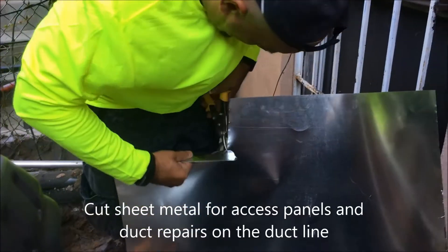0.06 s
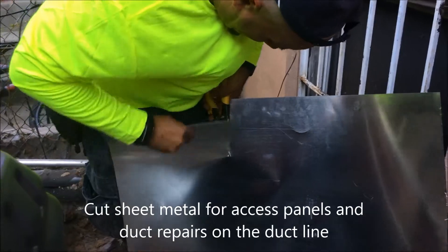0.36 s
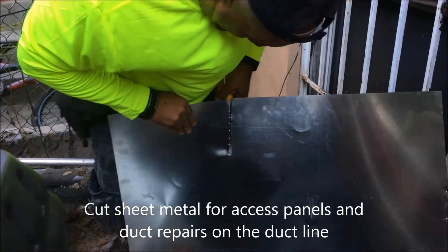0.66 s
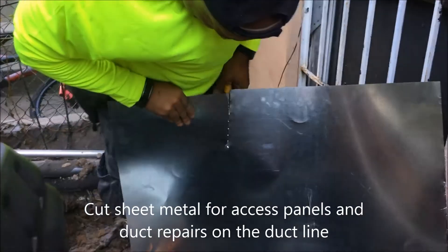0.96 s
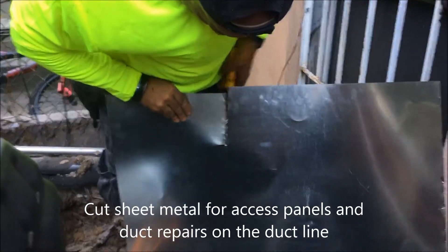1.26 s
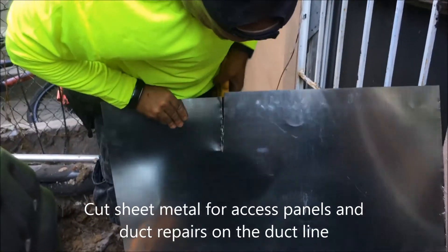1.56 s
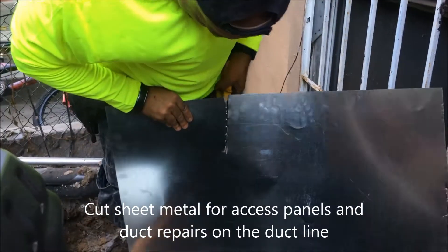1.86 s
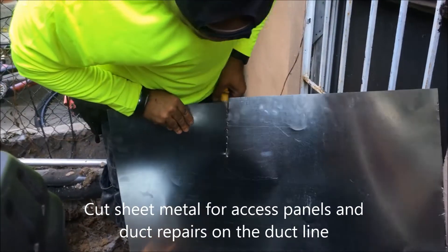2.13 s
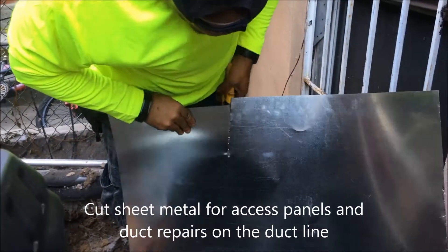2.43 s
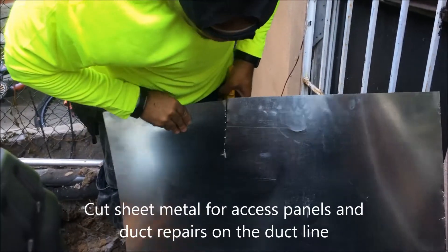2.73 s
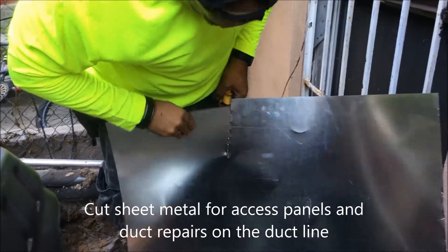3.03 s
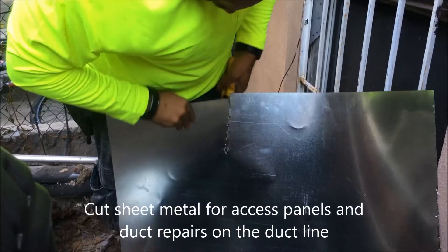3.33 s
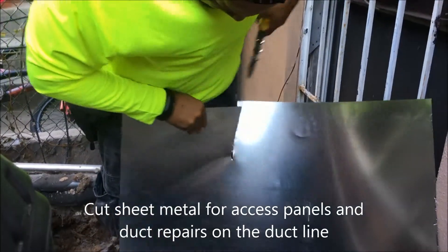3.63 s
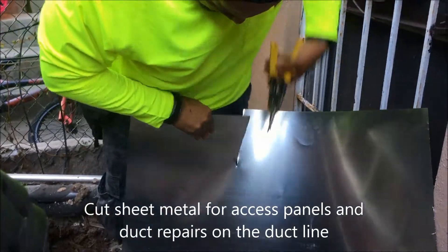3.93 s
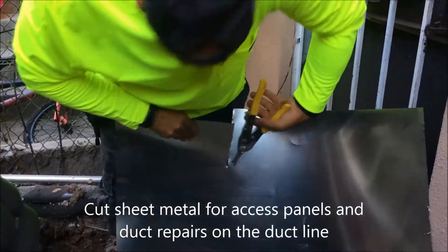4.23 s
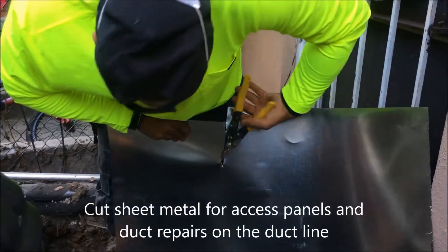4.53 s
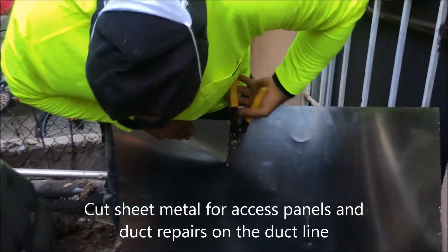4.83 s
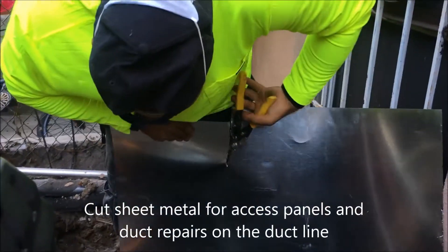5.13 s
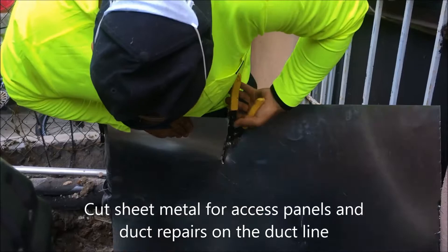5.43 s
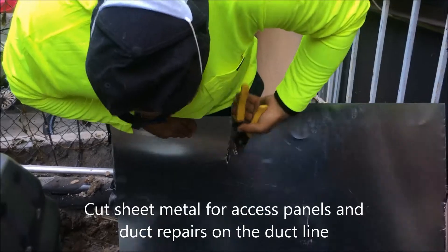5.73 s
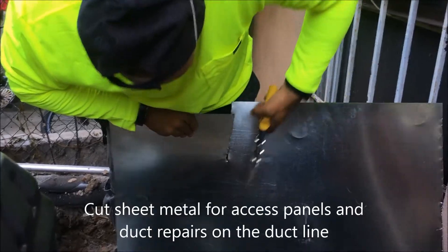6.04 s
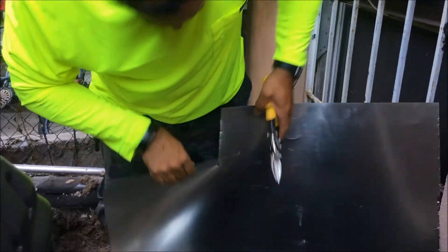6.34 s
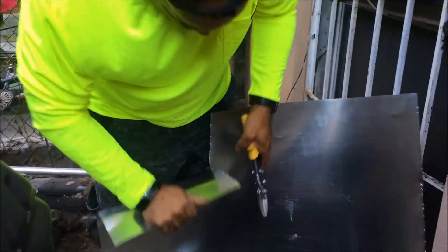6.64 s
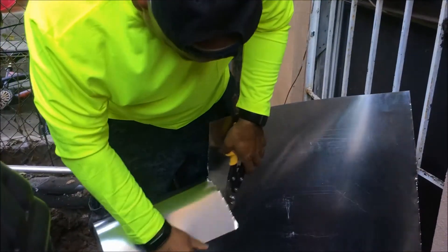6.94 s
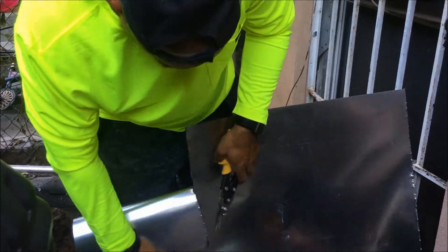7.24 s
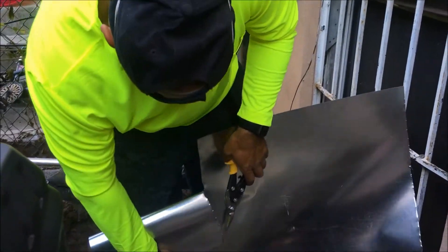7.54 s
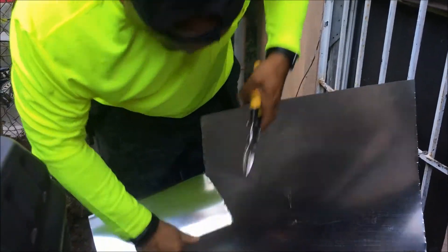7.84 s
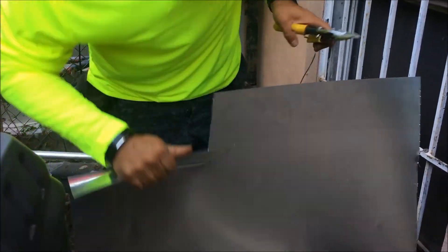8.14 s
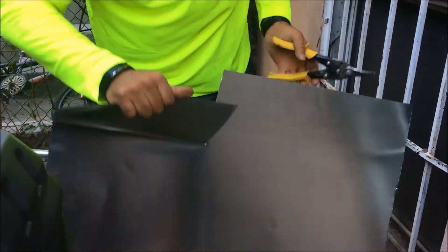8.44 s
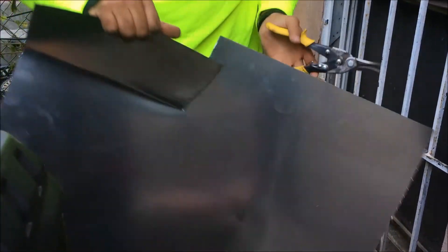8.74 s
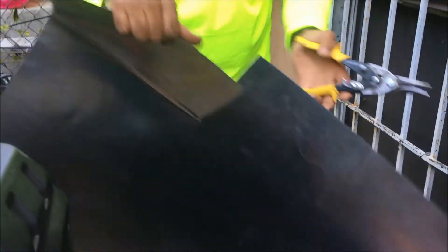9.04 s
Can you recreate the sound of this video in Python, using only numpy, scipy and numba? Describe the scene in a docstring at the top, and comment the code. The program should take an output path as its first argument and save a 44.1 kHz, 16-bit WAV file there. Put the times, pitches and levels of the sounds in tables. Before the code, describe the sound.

Hand snips cut a large thin steel sheet close by, over a faint low rumble. From the start to about 3.6 seconds come irregular sharp snaps and clacks, each leaving a short metallic ring, mixed with light flexing and scraping. Dull knocks stand out near 1.7 and 2.8 seconds, and the strongest snap lands at 3.2. From about 4.2 to 6 seconds the sheet wobbles briefly and more, mostly softer, bites and bumps follow. Around 6.4 seconds it gets louder as the cut flap is bent back: the metal warbles and its raw edges grate, with sharp clicks near 7.2 and a harsh scrape at 7.5. From 8 seconds the whole sheet is lifted, wobbling with short rising and falling whoops, scrapes, a few cracks and low thunder, peaking in a loud flex at about 9.1 seconds.

```python
"""Sharp snaps ring out over a low rumble: hand snips are biting through a large thin steel sheet.
Each stroke is an impulse that excites the sheet's dense modes, so it clacks, knocks and wobbles.
Then the cut flap is bent back, and the changing stiffness makes the modes slide in pitch.
The raw edges grate past each other by stick-slip friction, and the whole sheet is lifted
and thunders in its lowest modes."""
import sys
import numpy as np
from scipy import signal
from scipy.fft import rfft, irfft
from scipy.io import wavfile
from scipy.ndimage import uniform_filter1d, map_coordinates
from numba import njit

SR = 44100
rng = np.random.default_rng(int(sys.argv[2]) if len(sys.argv) > 2 else 0)


def materialize(psi):
    """Save the field psi as 16-bit PCM at rate SR to the path in sys.argv[1].

    A 1-D psi becomes a single channel; in a 2-D psi each row is a channel.
    """
    bounded = np.clip(np.atleast_2d(psi).T, -1, 1)
    quanta = np.round(bounded * 32767).astype(np.int16)
    wavfile.write(sys.argv[1], SR, quanta)


N = 409688
TIME = np.arange(N) / SR


def undb(db):
    """Decibels to amplitude."""
    return 10 ** (np.asarray(db) / 20)


def to_db(power):
    """Power to decibels."""
    return 10 * np.log10(power + 1e-18)


def unit(x):
    """Normalisation to rms 1."""
    return x / np.sqrt(np.mean(x ** 2) + 1e-18)


def attack_level(x, db):
    """Normalisation of a blow by the rms of its first 15 ms."""
    return x * undb(db) / np.sqrt(np.mean(x[:int(.015 * SR)] ** 2))


def steady(x):
    """Division by the running 50 ms rms evens out a texture and keeps its grain."""
    return x / np.sqrt(np.abs(uniform_filter1d(x ** 2, int(.05 * SR))) + 1e-12)


def fade(t, t60):
    """Exponential damping, 60 dB down after t60."""
    return np.exp(-np.log(1000) * t / t60)


def add(track, start, sound):
    """Superposition of a sound on a track, from a start time in seconds."""
    i = max(int(start * SR), 0)
    track[i:i + len(sound)] += sound[:N - i]


def colour(x, points):
    """Minimum-phase filter with a spectrum of (frequency [Hz], level [dB]) points."""
    hz, db = np.transpose(points)
    size = 4096
    grid = np.maximum(np.arange(size // 2 + 1) * SR / size, 1)
    cepstrum = irfft(np.log(undb(np.interp(np.log(grid), np.log(hz), db))))
    cepstrum[1:size // 2] *= 2
    cepstrum[size // 2 + 1:] = 0
    return signal.fftconvolve(x, irfft(np.exp(rfft(cepstrum))))[:len(x)]


@njit
def resonance(x, hz, q):
    """Two-pole resonator: a band-pass whose centre moves every sample."""
    y, band, low = np.empty(len(x)), 0., 0.
    damping = 1 / q
    for i in range(len(x)):
        g = np.tan(np.pi * hz[i] / SR)
        v = (band + g * (x[i] - low)) / (1 + g * (g + damping))
        band, low, y[i] = 2 * v - band, low + 2 * g * v, damping * v
    return y


def walk(rate):
    """Smooth random modulation of rms 1, with `rate` new values a second."""
    span = max(int(SR / rate), 2)
    steps = np.repeat(rng.standard_normal(N // span + 1), span)
    return unit(uniform_filter1d(uniform_filter1d(steps, span), span)[:N])


def slips(rate, spread_db):
    """Stick-slip as a Poisson process: `rate` tiny jerks a second, of uneven size."""
    size = undb(spread_db * np.minimum(rng.exponential(size=N), 5))
    return (rng.random(N) < rate / SR) * size * rng.choice([-1, 1], N)


# spectrum of the background: (frequency [Hz], level [dB])
RUMBLE_SPECTRUM = [(25, -31), (55, -1), (85, -10), (300, -21.5), (600, -20), (1200, -22), (3000, -36),
                   (8000, -44), (15500, -48.5)]


def rumble(level_db=-47):
    """Filtered noise, strongest in the bass, whose level wanders by about a decibel."""
    return unit(colour(rng.standard_normal(N), RUMBLE_SPECTRUM)) * undb(level_db + walk(2.8))


# the sheet's overlapping modes: (frequency [Hz], spectral level [dB], t60 [s])
DENSE_MODES = [(101, -26.5, 0.47), (312, -2.5, 0.3), (530, 0, 0.35), (1000, -4, 0.85), (1735, -4, 0.47),
               (2850, -18, 0.6), (5070, -21.5, 0.4), (9400, -30, 0.31), (15000, -38, 0.059)]
# modes that stand out from the rest: (frequency [Hz], level [dB])
CLEAR_MODES = [(905, 8), (1402, 12.5), (2102, 5), (2672, -1.5), (2762, -1), (3149, 4), (3768, -1.5),
               (4398, 1), (5340, -5), (5593, -10.5), (5889, -5)]


def sheet_response(clear_db=-7, t60_at_1khz=0.19):
    """Impulse response of a thin plate, with energy 1: a noise-like crowd of modes, a few clear ones."""
    t = TIME[:SR]
    hz, db, t60 = np.transpose(DENSE_MODES)
    grid = np.log(np.maximum(np.arange(SR // 2 + 1), 1))
    crowd = rfft(rng.standard_normal(SR)) * undb(np.interp(grid, np.log(hz), db))
    dense = sum(irfft(crowd * np.interp(grid, np.log(hz), band), SR) * fade(t, life)
                for band, life in zip(np.eye(len(hz)), t60))
    clear = sum(undb(level) * np.sin(2 * np.pi * (f * t + rng.random()))
                * fade(t, t60_at_1khz * (1000 / f) ** 0.85) for f, level in CLEAR_MODES)
    return unit(unit(dense) + undb(clear_db) * unit(clear)) / np.sqrt(SR)


def rung(drive, response):
    """Forced vibration: the drive convolved with an impulse response, at rms 1."""
    return unit(signal.fftconvolve(drive, response)[:N])


def with_ring(direct, sheet, ring_db):
    """Plate reverberation: a sound plus the ring it leaves in the sheet, ring_db relative to it."""
    return direct + undb(ring_db) * np.std(direct) * rung(direct, sheet)


def push(start, rise, hold, t60, swell=1.435):
    """Envelope of one push: forced motion swells and holds, then decays freely."""
    t = TIME[:int((rise + hold + t60) * SR)]
    out = np.zeros(N)
    add(out, start, np.minimum(t / rise, 1) ** swell * fade(np.maximum(t - rise - hold, 0), t60))
    return out


def shivers(t60, rise_s=0.021, hold_s=0.022):
    """Envelope of free vibration: each snap releases the sheet, in proportion to its after-ring."""
    return np.sqrt(sum((undb(ring) * push(start, rise_s, hold_s, t60)) ** 2 for start, *_, ring in SNAPS))


def stirring(t60, unsteady_db=4.0):
    """Envelope of random forcing: sheet and blades never quite rest while the snips work."""
    return push(start=0.62, rise=0.556, hold=5.0, t60=t60) * undb(unsteady_db * walk(9))


# the hand bending the sheet: (time [s], rise [s], hold [s], level [dB], centre [Hz], sway level [dB])
BENDS = [(0.801, 0.027, 0.064, -42.5, 1388, -40.5), (1.2, 0.025, 0.09, -32, 894, -37.5),
         (1.35, 0.037, 0.033, -25.5, 1268, -51), (1.58, 0.056, 0.028, -29.5, 894, -30.5),
         (2.02, 0.03, 0.011, -30, 680, -55), (2.104, 0.092, 0.033, -26, 1150, -32),
         (2.954, 0.015, 0.02, -31, 724, -54), (3.411, 0.073, 0.031, -26, 1113, -39),
         (3.567, 0.0089, 0.056, -24.5, 1099, -40), (3.769, 0.031, 0.092, -31.5, 752, -34.5),
         (4.17, 0.0043, 0.033, -38, 469, -32), (4.241, 0.042, 0.042, -24.5, 643, -28.5),
         (4.443, 0.047, 0.17, -37, 764, -32), (5.466, 0.08, 0.097, -33, 722, -42),
         (5.634, 0.041, 0.036, -28, 1152, -37), (5.775, 0.03, 0.036, -30, 1105, -31),
         (6.132, 0.14, 0.056, -36, 1186, -73), (6.313, 0.028, 0.045, -27.5, 1500, -57),
         (6.465, 0.052, 0.069, -22.5, 1355, -31), (6.599, 0.02, 0.046, -16.5, 1363, -31),
         (6.689, 0.038, 0.064, -15, 1494, -25.5), (7.183, 0.0055, 0.013, -13, 1173, -21),
         (7.331, 0.028, 0.032, -31, 1097, -41), (7.459, 0.037, 0.14, -15.5, 1652, -26.5),
         (7.685, 0.019, 0.043, -23.5, 1228, -30.5), (7.997, 0.055, 0.02, -13.5, 1407, -21),
         (8.057, 0.022, 0.047, -13.5, 1041, -30), (8.211, 0.034, 0.05, -16.5, 943, -23.5),
         (8.344, 0.03, 0.39, -20, 997, -23), (8.802, 0.07, 0.21, -24, 848, -26),
         (9.062, 0.031, 0.051, -11.5, 646, -23), (9.157, 0.031, 0.059, -16, 865, -33)]


def bending(t60=0.619, shiver_hz=921.6, stir_hz=756.4, held_db=-58.5, tightening=0.1432):
    """Level [dB] and centre [Hz] of the flexing: pushes add in power, and pitch rises with amplitude."""
    shiver = (undb(-2.5) * shivers(t60)) ** 2
    stir = (undb(-44.5) * stirring(t60)) ** 2 + undb(held_db) ** 2
    power = shiver + stir
    weighted_hz = shiver * shiver_hz + stir * stir_hz
    for start, rise, hold, db, hz, _ in BENDS:
        effort = push(start, rise, hold, t60)
        share = (undb(db) * effort) ** 2
        power += share
        weighted_hz += share * hz * effort ** tightening
    return to_db(power), weighted_hz / power


def sway_level(t60=1, held_db=-46.5):
    """Level [dB] of the panel's sway: bends, snaps, cutting and mere holding add in power."""
    power = sum((undb(db) * push(start, rise, hold, t60)) ** 2 for start, rise, hold, _, _, db in BENDS)
    shiver = undb(-3.5) * shivers(t60)
    stir = undb(-46) * stirring(t60)
    return to_db(power + shiver ** 2 + stir ** 2 + undb(held_db) ** 2)


# spectrum of the whole panel swaying: (frequency [Hz], level [dB])
PANEL_SPECTRUM = [(30, -13), (55, -15), (125, 1), (180, 4.5), (230, -6), (290, 5), (380, -4.5), (520, -9),
                  (900, -73.5)]


def swaying(sheet, gain_db=-1.5, split_hz=200, stiffening=0.33, rest_db=-36):
    """Nonlinear coupling: the panel's low modes thunder; a harder push moves energy to higher ones."""
    db = sway_level()
    thunder = colour(slips(rate=250, spread_db=-1.5), PANEL_SPECTRUM)
    deep = signal.sosfiltfilt(signal.butter(3, split_hz, fs=SR, output="sos"), thunder)
    tilt = undb(stiffening * (db - rest_db))
    tilted = deep / tilt + (thunder - deep) * tilt
    return with_ring(steady(tilted) * undb(db + gain_db), sheet, ring_db=-9)


# spectrum of the flexing sheet: (frequency [Hz], level [dB])
FLEX_SPECTRUM = [(150, -17.5), (300, 2), (480, -1.5), (950, -1), (1550, -1.5), (2100, -2.5), (2800, -0.5),
                 (5000, -47)]


def flexing(sheet, gain_db=-0.5, q=0.8, wobble_s=.006, slide=0.3005):
    """Curvature stiffens a plate: little buckles keep it ringing while all its modes slide together."""
    db, hz = bending()
    hz = np.clip(hz, 200, 4000)
    buckles = slips(rate=1000, spread_db=2.9)
    ringing = rung(buckles, sheet_response(clear_db=-13))
    ringing += unit(colour(buckles, np.array(DENSE_MODES)[:, :2]))
    bend = np.log(hz) - uniform_filter1d(np.log(hz), SR // 2)
    clock = np.arange(N) + slide * np.cumsum(bend) + wobble_s * SR * walk(5)  # faster means higher
    sliding = map_coordinates(ringing, [clock], order=3, mode="mirror")
    flex = colour(resonance(sliding, hz, q), FLEX_SPECTRUM)
    return with_ring(steady(flex) * undb(db + gain_db), sheet, ring_db=-11)


# narrow cries of sheet and blades: (time [s], length [s], start pitch [Hz], end pitch [Hz], level [dB])
WHOOP_GLIDES = [(0.64, 0.18, 924, 940, -51.5), (0.901, .045, 1610, 1635, -36),
                (1.057, 0.04, 11900, 12000, -48), (1.067, 0.13, 1017, 1210, -38.5),
                (4.244, 0.15, 702, 1253, -30.5), (4.561, 0.026, 2340, 2800, -37),
                (4.865, 0.058, 2990, 3200, -45), (5.638, 0.091, 1385, 1403, -29),
                (6.621, 0.19, 1303, 1700, -31), (8.07, 0.12, 1400, 1018, -19.5),
                (8.222, 0.09, 914, 1493, -19), (8.242, .13, 1685, 2135, -25), (8.367, .06, 1004, 935, -21),
                (8.69, .07, 901, 696, -22.5), (9.071, 0.04, 565, 680, -15), (9.112, 0.058, 744, 926, -11.5),
                (9.139, 0.16, 1054, 1153, -19)]


def whoops(sheet, relative_width=0.21):
    """Beating: a cluster of neighbouring modes swells and glides as the curvature changes."""
    out = np.zeros(N)
    for start, length, start_hz, end_hz, db in WHOOP_GLIDES:
        progress = np.linspace(0, 1, int(length * SR) + 2)
        phase = 2 * np.pi * np.cumsum(start_hz + (end_hz - start_hz) * progress) / SR
        lowpass = signal.butter(2, relative_width * start_hz / 2, fs=SR, output="sos")
        beats = signal.sosfilt(lowpass, rng.standard_normal((2, len(progress) + SR)))[:, SR:]
        cluster = beats[0] * np.sin(phase) + beats[1] * np.cos(phase)
        swell = np.sqrt(np.abs(np.sin(np.pi * progress)))
        add(out, start, unit(cluster * swell) * undb(db))
    return with_ring(out, sheet, ring_db=-10)


def brief_ring(drive, ring_db=-2, t60=0.037):
    """A short random ring gives crunches and scrapes narrow, uneven resonant peaks."""
    t = TIME[:SR // 10]
    ring = unit(rng.standard_normal(len(t)) * fade(t, t60)) / np.sqrt(len(t))
    return drive + undb(ring_db) * signal.fftconvolve(drive, ring)[:len(drive)]


# cut edges and blades grating: (time [s], rise [s], hold [s], level [dB], relative fizz level [dB])
SCRAPE_STROKES = [(0.808, .008, .005, -51, -20), (1.052, 0.014, 0.015, -42.5, -3),
                  (1.272, 0.0093, 0.035, -45, -7), (1.337, 0.024, 0.019, -32, -11),
                  (1.579, 0.017, 0.043, -42.5, -6), (1.63, 0.017, 0.017, -39, -12),
                  (1.888, 0.03, 0.12, -48, -9.5), (2.088, 0.088, .01, -38.5, -9),
                  (2.583, 0.011, 0.073, -55, -9), (3.07, .04, 0.12, -50, -12),
                  (3.384, 0.016, 0.055, -43, -15), (3.45, 0.03, 0.0066, -33.5, -7.5),
                  (3.941, 0.025, .01, -44, -12), (4.265, 0.018, 0.017, -37, -8),
                  (4.438, 0.046, .006, -40.5, -14), (4.67, 0.014, .006, -43.5, -11),
                  (4.873, 0.017, .01, -40, -19), (5.218, 0.0039, 0.0043, -53.5, 1.5),
                  (5.41, 0.086, 0.19, -49.5, -11), (5.622, 0.025, 0.029, -38.5, -12),
                  (5.785, 0.027, .01, -39.5, -9), (5.918, 0.012, 0.025, -52, -3),
                  (6.144, 0.065, 0.17, -48, -13), (6.295, 0.039, 0.12, -35.5, -16),
                  (6.455, 0.038, 0.091, -25.5, -8.5), (6.593, 0.034, 0.12, -19.5, -12),
                  (6.721, 0.057, 0.046, -23, -13), (6.823, 0.032, 0.02, -19, -9.5),
                  (7.198, 0.047, 0.022, -25.5, -16), (7.325, 0.023, 0.05, -27.5, -18),
                  (7.459, 0.013, 0.13, -12, -12.5), (7.876, 0.047, 0.066, -39.5, -12),
                  (7.991, 0.013, .04, -21, -14), (8.029, 0.052, 0.038, -18.5, -9.5),
                  (8.18, 0.031, 0.15, -29.5, -17.5), (8.35, 0.048, 0.23, -25, -13),
                  (8.6, 0.047, 0.17, -24, -34), (8.813, 0.026, 0.15, -35, -47),
                  (9.069, 0.0078, 0.019, -26, -3), (9.112, 0.025, 0.13, -29, -20)]


def friction(edge_t60=0.42, burr_t60=0.3):
    """Incoherent rubs add in power: the level [dB] of the edges, and of the burr's fizz relative to it."""
    shiver = undb(-26.5) * shivers(edge_t60)
    stir = undb(-68.5) * stirring(edge_t60)
    edge = shiver ** 2 + stir ** 2
    burr = (undb(-7) * shiver) ** 2 + (undb(-4) * stir) ** 2
    for start, rise, hold, db, fizz_db in SCRAPE_STROKES:
        edge += (undb(db) * push(start, rise, hold, edge_t60)) ** 2
        burr += (undb(db + fizz_db) * push(start, rise, hold, burr_t60)) ** 2
    return to_db(edge), to_db(burr) - to_db(edge)


# spectra of the grating edge and of its burr: (frequency [Hz], level [dB])
EDGE_SPECTRUM = [(900, -14), (1600, -0.5), (2200, 5.5), (3100, 3), (4500, -3), (5900, -7.5), (7500, -17),
                 (10000, -49)]
BURR_SPECTRUM = [(3500, -72), (5500, 9), (7000, 0), (9600, -2.5), (10500, -9.5), (11500, -3),
                 (15500, -10.5)]


def scraping(sheet, edge_db=-1, judder_db=0.83, dull_hz=3800, contact_db=-17):
    """Stick-slip friction: raw edges catch and let go, ringing the high modes; the burr fizzes on top."""
    db, fizz_db = friction()
    db = db + judder_db * walk(110)
    catches = brief_ring(slips(rate=2000, spread_db=3.4))
    edge = colour(catches, EDGE_SPECTRUM)
    # struck along its rim, steel radiates its high, clear modes best
    rim = np.diff(sheet_response(clear_db=-8.5, t60_at_1khz=.5))
    edge = unit(edge) + undb(-2) * rung(edge, rim)
    # when the burr loses contact only the duller part keeps sounding
    dull = signal.sosfiltfilt(signal.butter(2, dull_hz, fs=SR, output="sos"), edge)
    edge = dull + (edge - dull) * undb(np.minimum(fizz_db - contact_db, 0))
    grating = with_ring(steady(edge) * undb(db + edge_db), sheet, ring_db=-11)
    burr = colour(catches, BURR_SPECTRUM)
    fizz = steady(unit(burr) + undb(5) * rung(burr, np.diff(rim)))
    return grating + fizz * undb(db + fizz_db)


# the sheet bumping against hands and support: (time [s], level [dB], pitch [Hz])
SOFT_BLOWS = [(0.149, -20, 300), (0.208, -23.5, 350), (1.607, -21.5, 285), (1.631, -21.5, 287),
              (1.666, -13, 275), (1.935, -24, 308), (2.674, -15, 298), (2.691, -19, 302), (2.74, -20, 288),
              (2.766, -9.5, 304), (3.171, -30, 295), (3.561, -24, 262), (4.867, -24, 288),
              (5.057, -23.5, 199), (5.111, -23, 198), (5.138, -22, 304), (5.354, -22.5, 295),
              (5.91, -25, 200), (6.406, -20, 293), (7.189, -17, 330), (7.933, -25.5, 197),
              (8.635, -22, 295)]


def knocks(sheet, gain_db=-4, low_ratio=.55, scatter=0.12):
    """Soft impacts excite mainly low, heavily damped modes, whose pitch depends on the hold."""
    out, t = np.zeros(N), TIME[:SR // 5]
    for start, db, hz in SOFT_BLOWS:
        low_hz = hz * low_ratio * np.exp(scatter * rng.standard_normal())
        upper = np.sin(2 * np.pi * hz * t) * fade(t, 0.047)
        lower = undb(-3) * np.sin(2 * np.pi * low_hz * t) * fade(t, 0.046)
        thud = (upper + lower) * (1 - fade(t, 0.015))
        add(out, start, attack_level(thud, db + gain_db))
    return with_ring(out, sheet, ring_db=-9)


# spectrum of steel cracking or clicking: (frequency [Hz], level [dB])
CRACK_SPECTRUM = [(900, -13), (2200, 15), (4000, 7.5), (6300, 5), (10500, -9.5), (15500, -15)]


def crack(burst):
    """A brief, hard contact radiates mostly treble: a noise burst is given that spectrum."""
    return colour(burst, CRACK_SPECTRUM)


def ticks(rate=7, level_db=-69, t60=.07):
    """Light impacts: the blades touch at random moments and tick faintly."""
    tick = crack(rng.standard_normal(SR) * fade(TIME[:SR], t60))
    return undb(level_db) * rung(slips(rate, spread_db=1), tick)


# modes of the steel close to the jaws: (frequency [Hz], level [dB], t60 [s])
CLACK_MODES = [(522, -3, 0.047), (745, -2.5, 0.039), (909, 1, 0.069), (1305, -5, 0.038),
               (1613, -3.5, 0.043)]
# the jaws biting through: (time [s], body level [dB], crack level [dB], after-ring level [dB])
SNAPS = [(0.1076, -35, -38, -43), (0.153, -45, -31.5, -29), (0.2085, -24, -28, -33),
         (0.903, -35, -40.5, -37), (0.946, -19.5, -35, -29.5), (0.9502, -17.5, -28, -55),
         (1.082, -28, -34.5, -38.5), (1.353, -33, -39, -30), (1.7475, -27, -36, -32),
         (2.2161, -20.5, -30.5, -33.5), (2.4046, -24.5, -32, -30.5), (2.675, -32, -64, -39.5),
         (2.756, -31.5, -42, -33), (2.971, -29.5, -51, -41), (3.224, -13, -25.5, -28),
         (3.567, -22.5, -57, -29.5), (4.5688, -35, -41, -39), (4.87, -33.5, -49, -39),
         (4.96, -61, -41.5, -49.5), (5.0575, -31.5, -37.5, -31.5), (5.136, -19, -37.5, -37.5),
         (5.351, -29, -38, -35.5), (5.652, -35, -44, -33.5), (5.9117, -39, -38.5, -37.5),
         (6.027, -52, -42, -78), (7.188, -23, -58, -52), (7.237, -50.5, -20.5, -42),
         (7.351, -43, -26.5, -38), (8.003, -34, -34, -23.5), (8.596, -28, -20, -45), (9.082, -27, -30, -45)]


def snaps(sheet, scatter=0.025, retune=.03, buckle_t60=0.088, crunch_t60=0.13, spreading_s=0.037):
    """Fracture frees stored elastic energy: a crunch, a clack and a buckle, then the whole sheet rings."""
    out, t = np.zeros(N), TIME[:SR // 5]
    hz, db, t60 = np.transpose(CLACK_MODES)[:, :, None]
    early_ring = slice(int(.02 * SR), int(.06 * SR))
    buckle_band = signal.butter(2, [470, 1600], "band", fs=SR, output="sos")
    for start, body_db, crack_db, ring_db in SNAPS:
        # the jaws stand somewhere else and the sheet is bent differently at every bite
        tuning = np.exp(scatter * rng.standard_normal(hz.shape))
        bent = np.interp(TIME[:SR] * np.exp(retune * rng.standard_normal()), TIME[:SR], sheet)
        phase = 2 * np.pi * (hz * tuning * t + rng.random(hz.shape))
        clack = (undb(db) * np.sin(phase) * fade(t, t60)).sum(0)
        buckle = signal.sosfilt(buckle_band, rng.standard_normal(len(t)) * fade(t, buckle_t60))
        blow = attack_level(clack, 0) + attack_level(buckle, -1)
        add(out, start, attack_level(blow * (1 - fade(t, 0.004)), body_db))
        grains = rng.standard_normal(len(t))
        grains *= undb(2 * np.repeat(rng.standard_normal(len(t)), SR // 1000)[:len(t)])  # 1 ms each
        # a slow bite crunches longer and feeds the ring more than the clack
        slowness = min(undb((ring_db - body_db) / 2), 2)
        crunch = grains * fade(t, crunch_t60 * slowness)
        add(out, start, attack_level(crack(brief_ring(crunch)), crack_db))
        tail = bent * (1 - fade(TIME[:SR], spreading_s))  # the waves need a moment to fill the sheet
        add(out, start, tail * undb(ring_db) / np.std(tail[early_ring]))
    return out


def scene():
    """Superposition of the blows and the handling of one sheet, over the rumble."""
    sheet = sheet_response()
    blows = snaps(sheet) + knocks(sheet) + ticks()
    handling = flexing(sheet) + whoops(sheet) + swaying(sheet) + scraping(sheet)
    return (blows + handling + rumble())[None]


def record(dry, bottom_hz=38, top_hz=15900):
    """Band limiting and soft saturation: the deepest bass and the top are cut, high peaks rounded."""
    heard = signal.sosfilt(signal.butter(2, bottom_hz, "high", fs=SR, output="sos"), dry)
    rounded = heard / (1 + heard ** 6) ** (1 / 6)
    return signal.sosfilt(signal.ellip(10, .2, 70, top_hz, fs=SR, output="sos"), rounded)


dry = scene()
out = record(dry)
materialize(out)
```